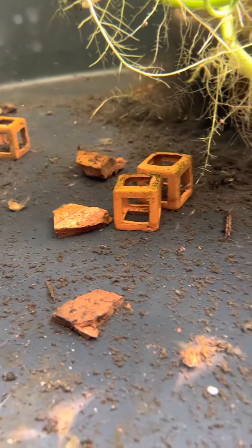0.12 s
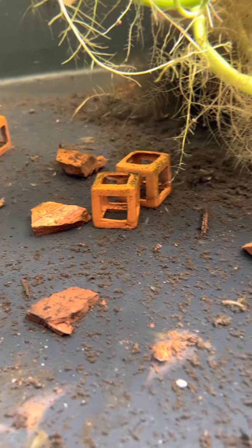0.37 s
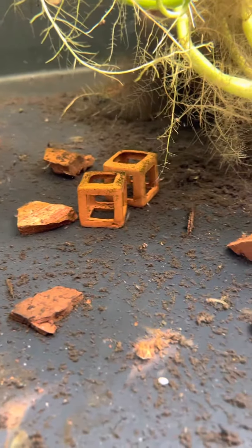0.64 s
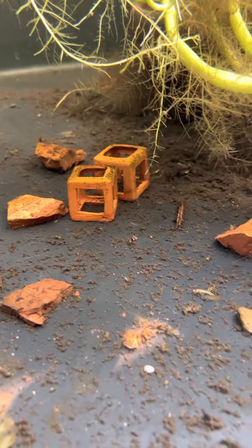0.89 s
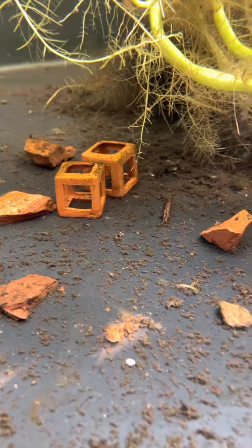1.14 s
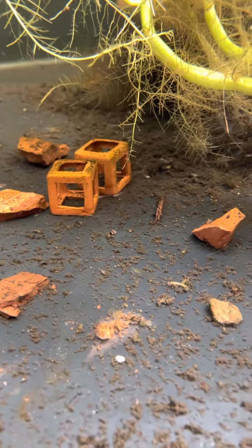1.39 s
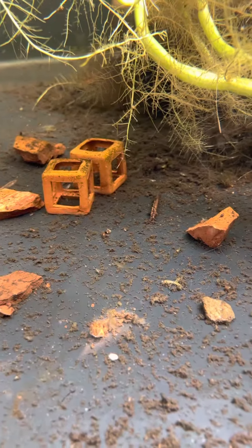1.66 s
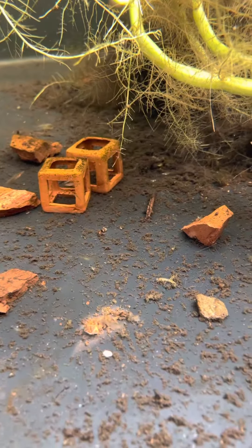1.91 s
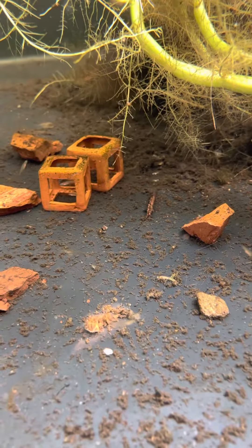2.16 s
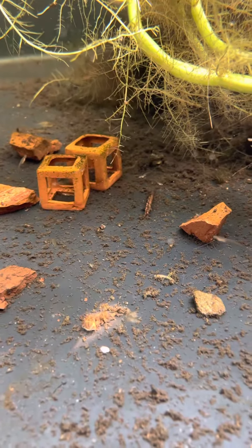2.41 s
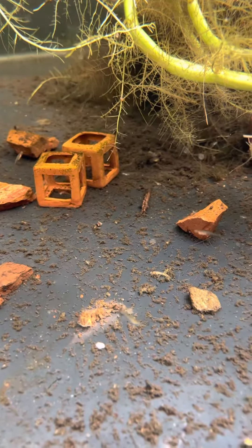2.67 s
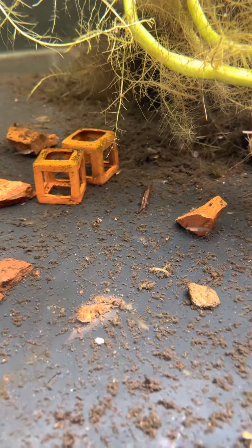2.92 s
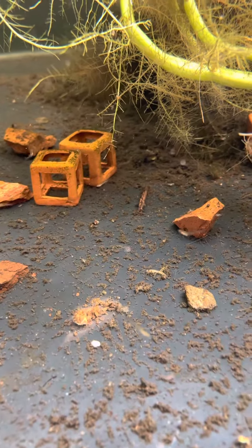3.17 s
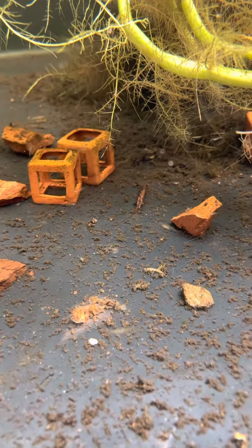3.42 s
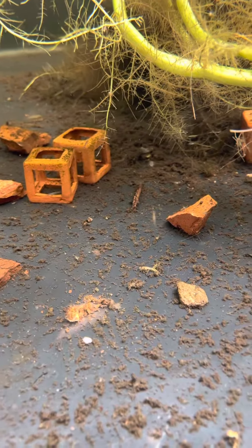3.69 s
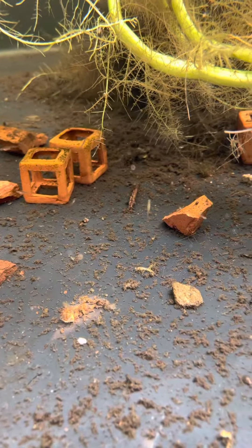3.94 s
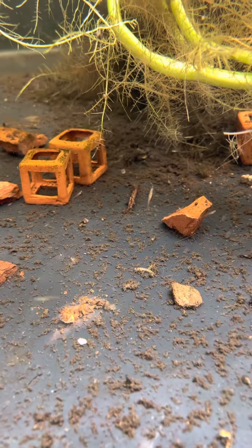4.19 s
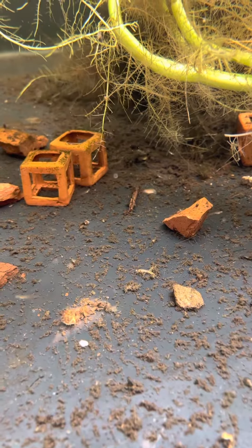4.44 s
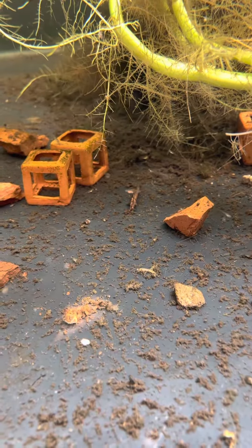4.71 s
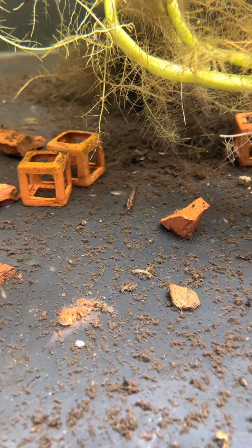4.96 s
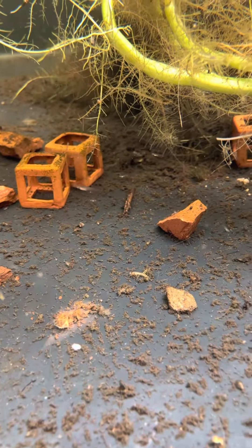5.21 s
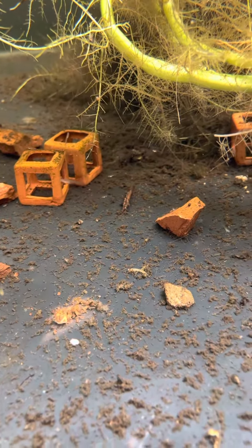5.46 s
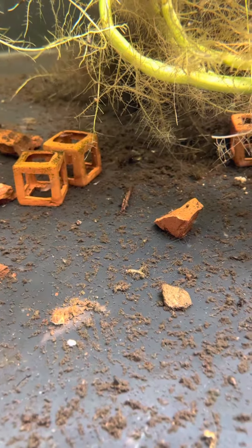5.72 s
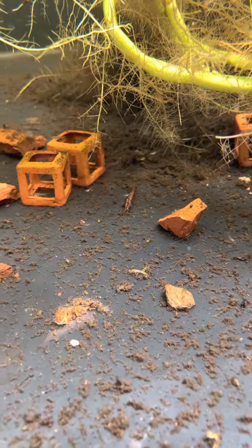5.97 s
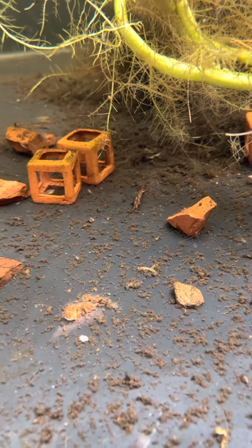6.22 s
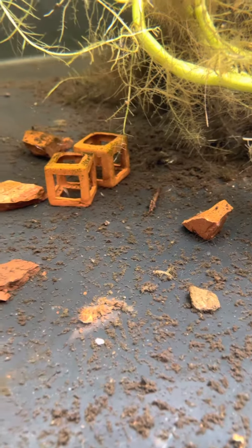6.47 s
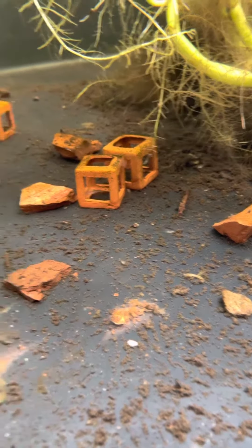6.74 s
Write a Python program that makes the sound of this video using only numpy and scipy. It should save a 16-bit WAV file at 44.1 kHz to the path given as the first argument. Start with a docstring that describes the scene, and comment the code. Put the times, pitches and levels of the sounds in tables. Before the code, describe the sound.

Close to a fish tank, low mains hum and soft bubbling water run throughout, with one early thump and several dull knocks near the end.

```python
"""Beside a fish tank, with a phone held close to the glass and recording in stereo.
The air pump hums as steady sine lines on the mains cycle, with a faint high whine from its coil.
Coloured noise in flickering bands makes the water: a boom and rush in the glass, a fizz at the surface.
Short noise bursts are the sprays and snaps of single bubbles bursting.
The gripping hand is a low noise rumble; knocks on the casing are falling chirps, some with a ring and rattle."""
import sys
import numpy as np
from scipy import signal
from scipy.fft import rfft, irfft, next_fast_len
from scipy.io import wavfile
from scipy.ndimage import uniform_filter1d

SR = 44100
rng = np.random.default_rng(int(sys.argv[2]) if len(sys.argv) > 2 else 0)


def log_audio(samples):
    """Write samples as a 16-bit WAV file to the path given in sys.argv[1]."""
    # one column per channel
    frames = np.atleast_2d(samples).T
    # limit to full scale, then quantise
    limited = np.clip(frames, -1, 1)
    pcm = np.round(limited * 32767).astype(np.int16)
    wavfile.write(sys.argv[1], SR, pcm)


def makeup_ratio(level_db):
    """Linear amplitude ratio for a level in decibels (20 dB per factor of ten)."""
    decades = np.asarray(level_db, float) / 20
    return 10 ** decades


N = 302526

# lines of the pump hum, before their swell: multiple of the mains, left rms level/dB, right rms level/dB
HUM_LINES = [(1, -15.7, -14.5), (2, -27, -27.5), (3, -35, -31), (4, -47, -57), (5, -45.5, -54),
             (6, -39.5, -43.5), (7, -50, -48.5), (8, -54, -55)]
# slow swell of the hum: t/s, lowest line level/dB, overtones level/dB
HUM_SWELL = [(0, 0, -1), (4, 0, -0.5), (5.5, -1, -1), (6.86, -0.5, -1.5)]
# colour of the big bubbles booming in the tank: f/Hz, relative level/dB per Hz
BOOM_COLOUR = [(120, -21), (170, -12.5), (220, -9.5), (300, 1.5), (370, -2.5), (440, -13), (560, -28)]
# colour of the water rush through the glass: f/Hz, relative level/dB per Hz
RUSH_COLOUR = [(400, -85), (480, -71), (580, -67), (720, -71), (900, -71), (1130, -66), (1400, -78),
               (1700, -84), (2450, -88), (2900, -94.5), (3400, -91), (3730, -85), (4000, -96),
               (4700, -97.5), (5600, -110)]
# water strength as the phone pans along the glass: t/s, boom level/dB, rush level/dB
WATER_FLOW = [(0, -29.5, -38), (1.5, -34, -39.5), (3.6, -33.5, -39.5), (5.2, -36.5, -40), (6.86, -34, -40)]
# colour of the fizz at the surface: f/Hz, relative level/dB per Hz
FIZZ_COLOUR = [(4500, -24.5), (6000, -9.5), (6500, -8), (6800, -3.5), (7200, -9), (7800, -4.5), (8200, 0),
               (9600, 0.5), (10300, -4.5), (11500, -24.5)]
# bubbles bursting in a short spray: t/s of the crest, rms level/dB at the crest, f/Hz, a third of the length/ms
SPRAYS = [(0.171, -62, 5500, 30), (0.461, -58.5, 5080, 15), (0.547, -56.5, 4550, 19),
          (0.714, -59, 3570, 11), (1.024, -48.5, 3660, 18), (1.383, -53, 4800, 12), (1.661, -50, 3950, 12),
          (2.572, -53.5, 4130, 12), (2.97, -53.5, 3720, 12.6), (3.124, -57.5, 4740, 40),
          (3.408, -49.5, 3520, 13.4), (3.544, -56, 4580, 17), (3.806, -49, 4600, 10.5),
          (3.874, -56, 3860, 16), (4.168, -49.5, 4460, 13), (4.21, -36, 2575, 15), (5.021, -56, 4520, 19),
          (5.445, -44.5, 3600, 8.5), (5.516, -52, 4510, 26), (5.977, -54, 4640, 12),
          (6.241, -53.5, 3680, 13)]
# fine bubbles snapping: t/s of the crest, rms level/dB at the crest, f/Hz
SNAPS = [(0.322, -55, 8340), (1.8173, -57, 9690), (2.4459, -55, 10040), (3.043, -54.5, 9530),
         (4.0757, -55.5, 9430), (4.2071, -55, 10230), (4.4952, -48, 9400), (4.7473, -55.5, 9250),
         (6.0425, -54.5, 8930), (6.7043, -58, 9430)]
# colour of the hand rumble: f/Hz, relative level/dB per Hz
HAND_COLOUR = [(15, -20), (30, -9.5), (60, 1), (80, -2.5), (110, -7), (160, -14.5), (260, -30.5)]
# hand restlessness, greater while the phone is moved: t/s, level/dB
HAND_GRIP = [(0, -28), (.4, -32), (1.15, -28.5), (1.6, -34), (2.2, -29.5), (2.5, -35.5), (3.35, -37),
             (3.5, -29), (3.7, -35.5), (4.9, -35.5), (5.5, -30.5), (6.86, -27.5)]
# knocks on the casing: t/s, nominal peak level/dB before the fingertip softens it, starting f/Hz, fade time/ms
CASING_KNOCKS = [(1.9393, -16, 435, 30), (6.0458, -15, 283, 24), (6.0535, -20, 850, 7),
                 (6.1193, -16, 283, 24), (6.1275, -19, 850, 8), (6.2218, -15, 283, 24),
                 (6.2335, -22, 1000, 6), (6.2501, -14, 218, 26), (6.3160, -20, 900, 10),
                 (6.3885, -18, 950, 11), (6.4185, -20, 850, 7), (6.4246, -12.5, 218, 38),
                 (6.5006, -15, 218, 32), (6.5775, -23, 800, 9), (6.6665, -19, 850, 8),
                 (6.7755, -9, 3000, 3.6), (6.7806, -13, 218, 42), (6.8264, -8.5, 2580, 60)]
# ring of the casing after a sharp knock: f/Hz, level/dB relative to the knock, t60/s
CASING_RING = [(482, -4, .04), (1110, -14, .02)]
# stereo image by frequency: f/Hz, left lead/rad, left minus right level/dB, likeness of the sides/0-1
STEREO_IMAGE = [(60, 1.1, 4, .9), (180, 1.4, 3, .65), (280, .6, 4, .93), (450, 2.3, 2, .55),
                (650, 2.3, 2, .75), (900, 2.9, 0, .4), (1080, 4.8, 1.5, .65), (1350, 5.1, 0, .5),
                (1700, 3.7, 0, .8), (2400, 3.14, 0, .99), (3000, 3.16, 0, .99), (3700, 3.9, .4, .9),
                (4600, 3.14, .5, .96), (5600, 2.8, 1.5, .85), (6800, 2.2, 1.5, .7), (8200, 1.1, 3, .93),
                (10500, .05, 1, .93)]

MAINS_HZ, STROKE_S = 50.152, -0.01193  # pump rate; start of the first pump stroke
T = np.arange(N) / SR
SIZE = next_fast_len(N + 8192)
F = np.maximum(np.arange(SIZE // 2 + 1) * SR / SIZE, 1.)


def curve(table, column=1):
    """A time table joined by straight lines."""
    return np.interp(T, [row[0] for row in table], [row[column] for row in table])


def over_hz(table, column=1):
    """A frequency table joined on a log axis."""
    return np.interp(np.log(F), np.log([row[0] for row in table]), [row[column] for row in table])


def walk(rate):
    """Random levels held 1 / rate s and slewed twice; spread near 1."""
    hold = int(SR / rate)
    levels = np.repeat(rng.standard_normal(N // hold + 1), hold)
    return 1.3 * uniform_filter1d(uniform_filter1d(levels, hold), hold)[:N]


def wavering_noise(colour, flicker_db, flicker_rate, shared_db):
    """Two unrelated noises of one colour, rms 1; each half-octave band flickers alone and with the others."""
    lowest_hz, highest_hz = colour[0][0], colour[-1][0]
    inside = (F >= lowest_hz / 2) & (F <= highest_hz)
    spectrum = rfft(rng.standard_normal((2, SIZE))) * makeup_ratio(over_hz(colour)) * inside
    out, shared = 0, shared_db * walk(flicker_rate)
    for step in np.arange(np.floor(2 * np.log2(lowest_hz)) - 2, 2 * np.log2(highest_hz) + 1):
        band = np.cos(np.pi / 2 * np.clip(2 * np.log2(F) - step, -1, 1)) ** 2
        # above 2 kHz fewer bubbles share a band, so it flickers more
        own_db = flicker_db * (1 + 0.24 * max(step / 2 - 11, 0))
        flicker = makeup_ratio(shared + own_db * walk(flicker_rate))
        out = out + flicker * irfft(spectrum * band, SIZE)[:, :N]
    return out / np.sqrt(np.mean(out ** 2))


def add(track, s, sound):
    """Mix a short sound in at s seconds."""
    i = int(s * SR)
    track[..., i:i + sound.shape[-1]] += sound[..., :N - i]


def stereo_image(direct, unlike):
    """The left side is the direct sound; the right is that sound shifted in phase, partly replaced by another."""
    like = np.clip(over_hz(STEREO_IMAGE, column=3), 0, 1)
    lead, tilt_db = over_hz(STEREO_IMAGE), over_hz(STEREO_IMAGE, column=2)
    edge = (SIZE - N) // 2
    left, other = (rfft(np.pad(x, edge, "reflect"), SIZE) for x in (direct, unlike))
    right = like * left * np.exp(-1j * lead) + np.sqrt(1 - like ** 2) * other
    return irfft(np.array([left, right * makeup_ratio(-tilt_db)]), SIZE)[:, edge:edge + N]


def whine():
    """The pump coil sings faintly at a high pitch, flipped by the mains into a close pair of lines."""
    pair = np.sin(2 * np.pi * 9600.1 * T) * np.sin(2 * np.pi * MAINS_HZ * T)
    return makeup_ratio(-80.5 + 2.0 * walk(4)) * pair


def fizz():
    """Fine hiss with a sprinkle of tiny snaps whose sizes have a long tail; it swells and ebbs at a steady pace."""
    ebb_db, swell_db, period_s, crest_s = -74, 5, 1.255, .57
    sparks = makeup_ratio(3.3 * rng.exponential(size=N // 64))
    grain = 1 + 0.33 * uniform_filter1d(np.repeat(sparks, 64), 48)
    grain = np.pad(grain, (0, N - len(grain)), "edge")
    grain = grain / np.sqrt(np.mean(grain ** 2))
    hiss = wavering_noise(FIZZ_COLOUR, flicker_db=1.07, flicker_rate=22.0, shared_db=1.14)
    crest = np.cos(np.pi * (T - crest_s) / period_s) ** 4
    return makeup_ratio(ebb_db + swell_db * crest + walk(8)) * hiss * grain


def chance_bursts(count, low_hz, octaves, level_db, db_per_octave, scatter_db, length_ms):
    """Rows of bursts at random moments, crowded toward the lowest pitch; the level tilts with pitch."""
    when, high, size = rng.random((count, 3)).T
    high = octaves * high ** 2
    levels = level_db + db_per_octave * high + scatter_db * (2 * size - 1)
    return [(s * N / SR, db, low_hz * 2 ** h, length_ms) for s, db, h in zip(when, levels, high)]


def bursts(table, spread):
    """Each burst is a puff of noise ringing around its own pitch, swelling and fading smoothly."""
    out = np.zeros((2, N))
    for s, crest_db, hz, length_ms in table:
        count = int(3.0 * length_ms * SR / 1000)
        edges = np.clip([hz / (1 + spread), hz * (1 + spread)], 100, .45 * SR)
        band = signal.butter(3, edges, "band", fs=SR, output="sos")
        noise = signal.sosfilt(band, rng.standard_normal((2, 6000)))
        puff = (noise / noise.std())[:, -count:] * np.hanning(count)
        add(out, max(s - count / SR / 2, 0), makeup_ratio(crest_db) * puff)
    return out


def sprays():
    """Bubbles bursting in short sprays of noise, with further ones at random, fainter the higher they are."""
    more = chance_bursts(count=40, low_hz=4360, octaves=.7, level_db=-60.5, db_per_octave=-11,
                         scatter_db=3, length_ms=15)
    return bursts([*SPRAYS, *more], spread=.1)


def snaps():
    """Fine bubbles snap as very short, high puffs of noise, with further ones at random."""
    length_ms = 0.92  # a third of each snap
    more = chance_bursts(count=10, low_hz=9100, octaves=.1, level_db=-57, db_per_octave=0.5,
                         scatter_db=1.0, length_ms=length_ms)
    return bursts([(*snap, length_ms) for snap in SNAPS] + more, spread=0.13)


def casing():
    """Sharp knocks ring the casing briefly and shake a faint rattle out of loose parts."""
    sharp_hz = 600  # knocks that start above this pitch are sharp enough to ring the casing
    rattle_hz, rattle_db, rattle_t60_s = 2500, -32, .12
    out, t = np.zeros(N), np.arange(int(.12 * SR)) / SR

    def fade(t60):
        """Exponential decay with a soft onset of 2 ms time constant."""
        return np.exp(-np.log(1000) * t / t60) * (1 - np.exp(-t / .002))

    ring = sum(makeup_ratio(db) * fade(t60) * np.sin(2 * np.pi * hz * t) for hz, db, t60 in CASING_RING)
    band = signal.butter(2, [rattle_hz / 1.25, rattle_hz * 1.25], "band", fs=SR, output="sos")
    buzz = signal.sosfilt(band, rng.standard_normal((len(CASING_KNOCKS), len(t))))
    for (s, peak_db, first_hz, _), noise in zip(CASING_KNOCKS, buzz / buzz.std()):
        if first_hz > sharp_hz:
            rattle = makeup_ratio(rattle_db) * fade(rattle_t60_s) * noise
            add(out, s, makeup_ratio(peak_db) * (rattle - ring))
    return out


def knocks():
    """A bending wave runs along the casing, highs first and lows late: each swing outlasts the one before."""
    slowing = 1.35  # swings made while the pitch falls by a factor e
    out, t = np.zeros(N), np.arange(int(.12 * SR)) / SR
    for s, peak_db, first_hz, fade_ms in CASING_KNOCKS:
        turn = 2 * np.pi * slowing * np.log(1 + t * first_hz / slowing)
        press = np.sin(np.minimum(turn / 4, np.pi / 2)) ** 2  # rises over the first swing
        fade = np.exp(-(1000 * t / fade_ms) ** 2)
        add(out, s, -makeup_ratio(peak_db) * press * fade * np.sin(turn))
    # the soft fingertip leaves little treble
    return signal.sosfilt(signal.butter(3, 1350, fs=SR, output="sos"), out)


def hand():
    """Skin and muscle move the casing: a restless low rumble that twitches."""
    twitch_db, twitches_per_s = 1.5, 8.2
    rumble = wavering_noise(HAND_COLOUR, flicker_db=0.5, flicker_rate=14.0, shared_db=-1.0)
    return makeup_ratio(curve(HAND_GRIP) + twitch_db * walk(twitches_per_s)) * rumble


def rush():
    """Big bubbles boom in the tank and small ones hiss in the glass, slightly louder on each pump stroke."""
    stroke = 1 + 0.047 * np.cos(2 * np.pi * (MAINS_HZ * T - .45))
    boom = wavering_noise(BOOM_COLOUR, flicker_db=1.0, flicker_rate=18., shared_db=.5)
    hiss = wavering_noise(RUSH_COLOUR, flicker_db=1.14, flicker_rate=26., shared_db=0.83)
    return stroke * (makeup_ratio(curve(WATER_FLOW)) * boom + makeup_ratio(curve(WATER_FLOW, column=2)) * hiss)


def pump():
    """The diaphragm snaps forward and eases back once a mains cycle: a rounded saw-tooth of steady pitches."""
    out = np.zeros((2, N))
    for k, left_db, right_db in HUM_LINES:
        turn = 2 * np.pi * k * MAINS_HZ * (T - STROKE_S)
        # the right microphone lies further from the pump: 0.22 ms and a fixed phase later
        lag = .14 + 2 * np.pi * k * MAINS_HZ * .00022
        swell = makeup_ratio(curve(HUM_SWELL, column=1 if k == 1 else 2) + 0.1 * k * walk(3.4))
        left, right = makeup_ratio(left_db) * np.sin(turn), makeup_ratio(right_db) * np.sin(turn - lag)
        out += np.sqrt(2) * swell * np.array([left, right])
    return out


def scene():
    """Water and hand differ between the sides; knocks, casing and whine reach both as one wave; hum joins them."""
    diffuse = rush() + fizz() + sprays() + snaps() + hand()
    solid = knocks() + casing() + whine()
    return pump() + stereo_image(*diffuse) + stereo_image(solid, np.zeros(N))


def low_pass(x):
    """Removes everything above the highest recorded frequency."""
    return signal.sosfilt(signal.butter(12, 11310, fs=SR, output="sos"), x)


def record(dry):
    """The phone stores the finished stereo mix."""
    return low_pass(dry)


dry = scene()
out = record(dry)
log_audio(out)
```